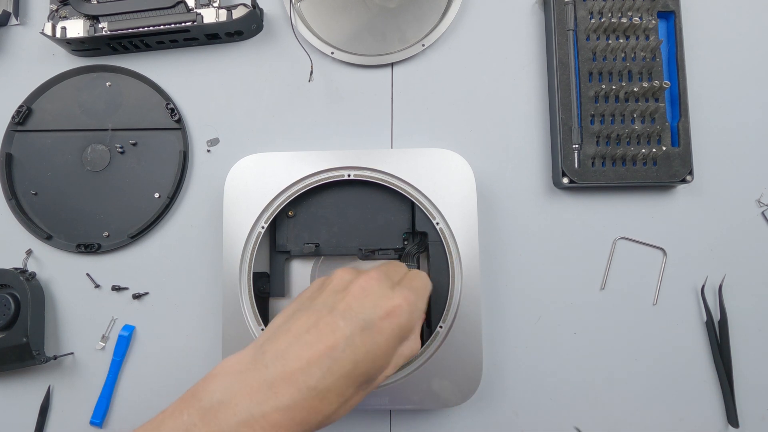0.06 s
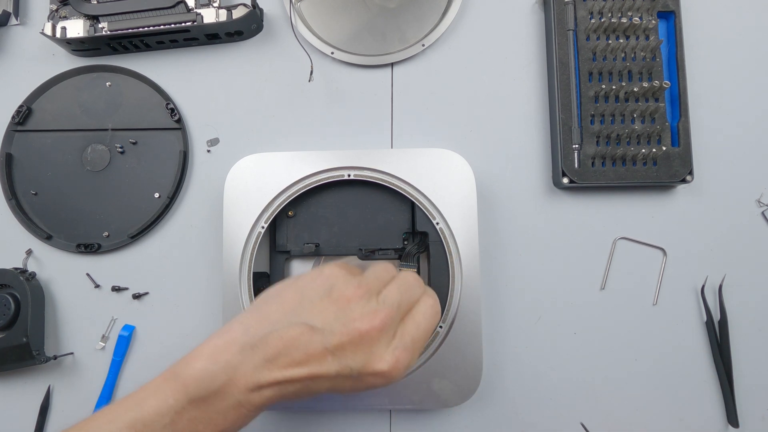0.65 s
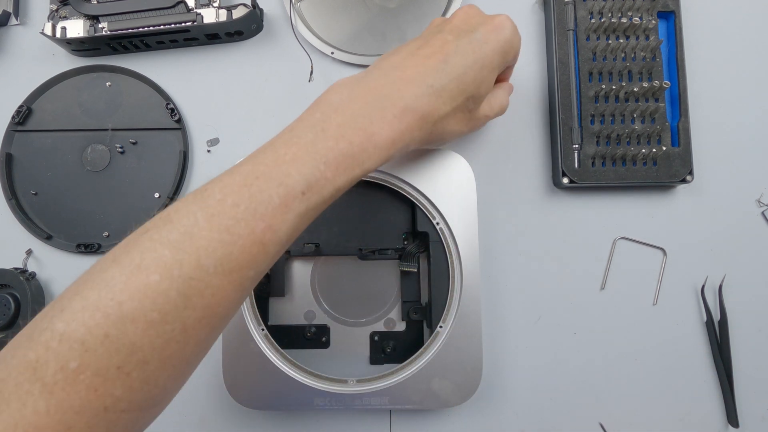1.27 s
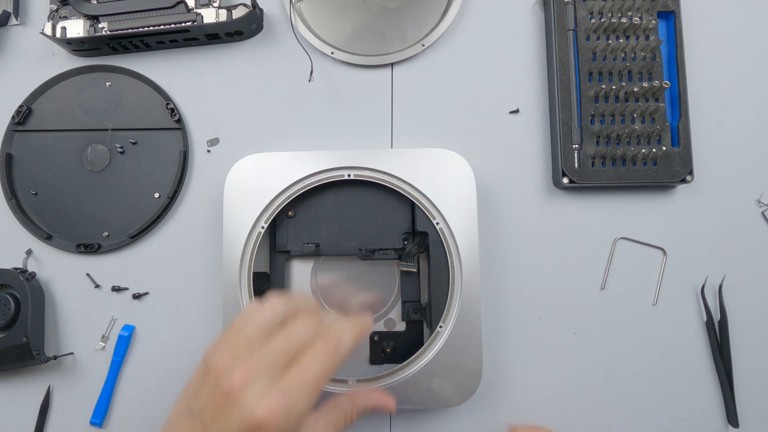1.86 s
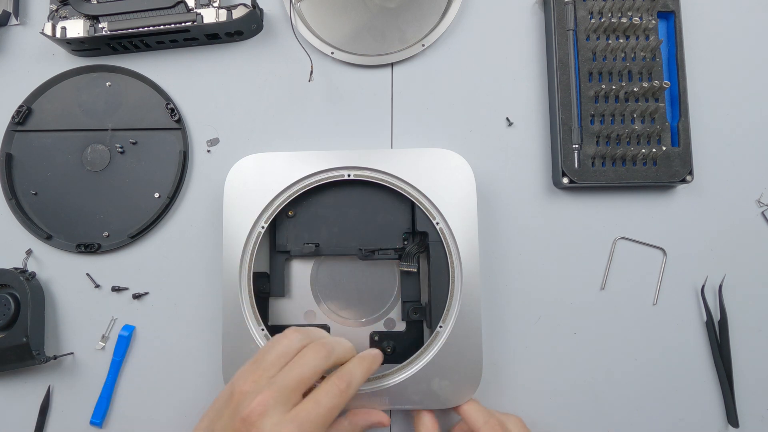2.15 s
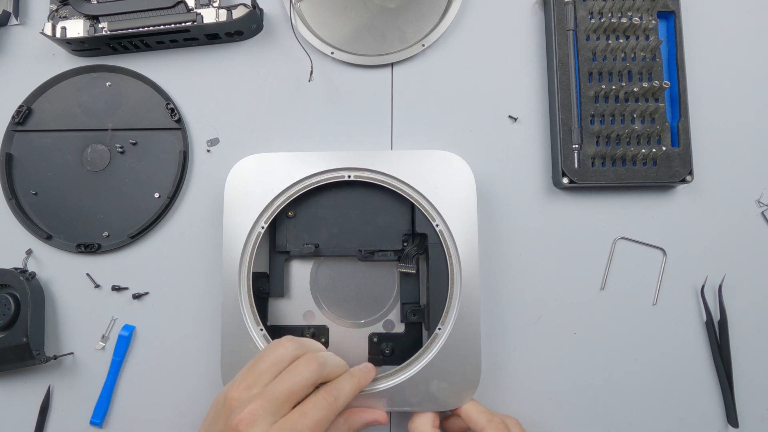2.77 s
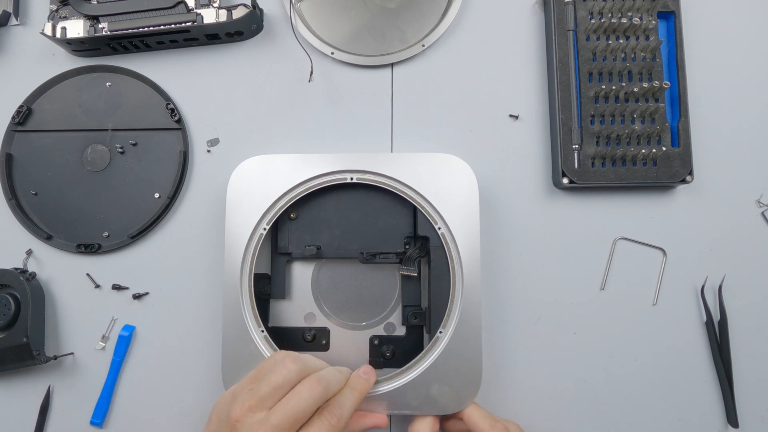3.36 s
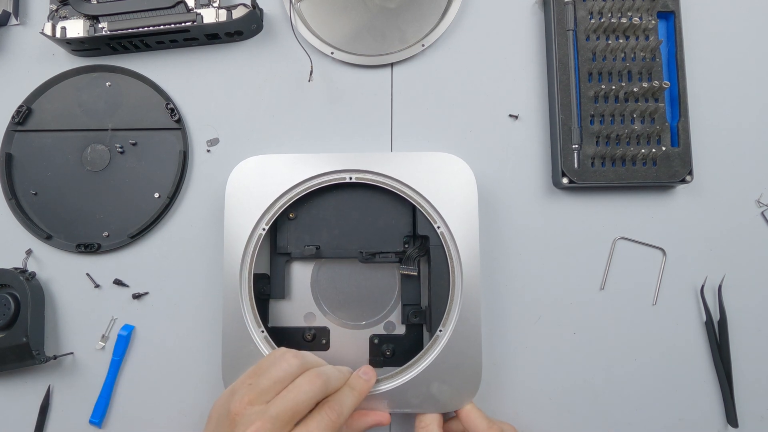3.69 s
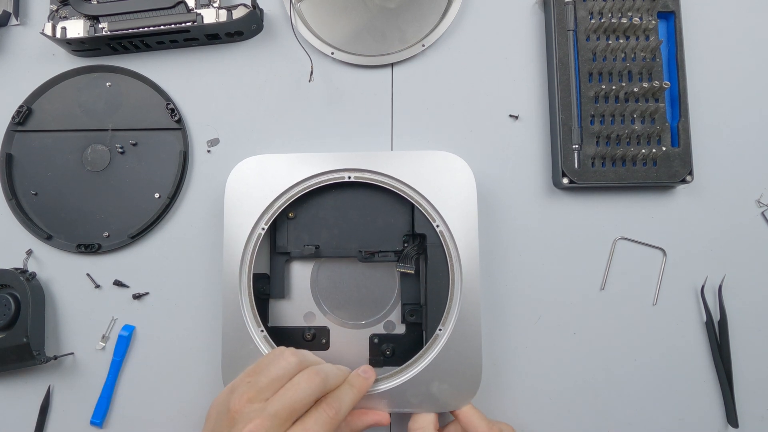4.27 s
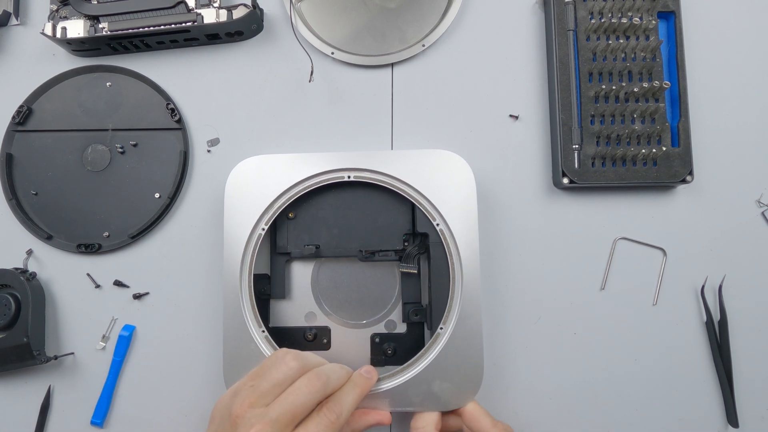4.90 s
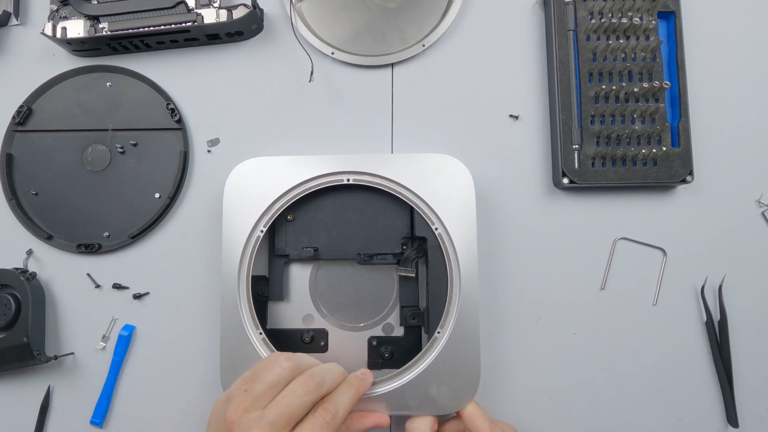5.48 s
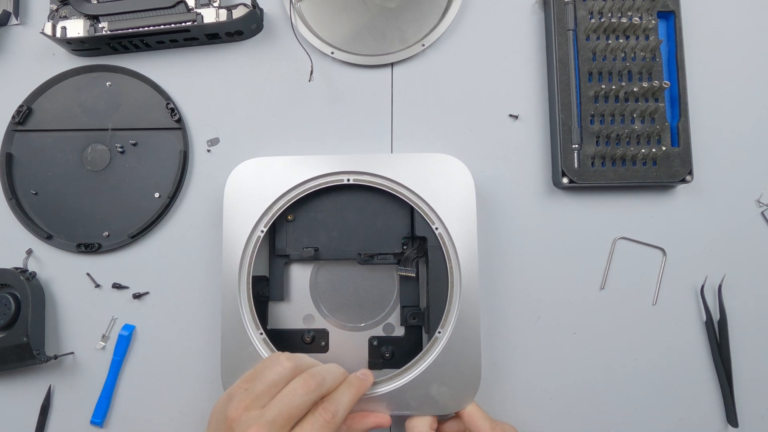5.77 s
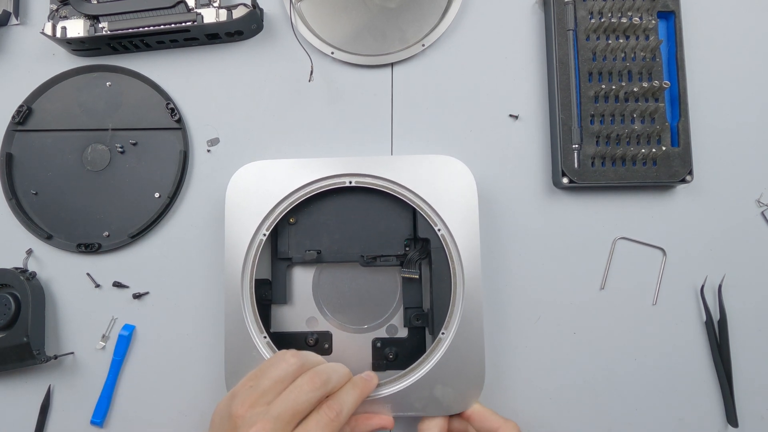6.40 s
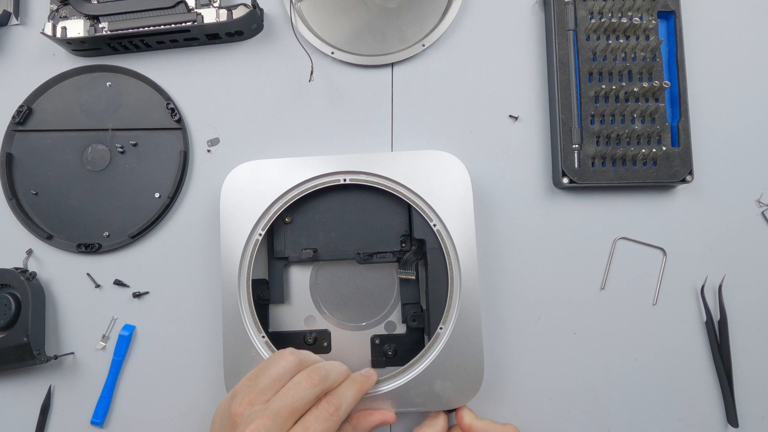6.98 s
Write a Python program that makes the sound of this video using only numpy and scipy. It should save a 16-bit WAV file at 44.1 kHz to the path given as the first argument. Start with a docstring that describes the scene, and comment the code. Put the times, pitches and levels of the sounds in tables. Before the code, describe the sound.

A small screw ticks against metal as it is picked out of an open aluminium computer case and put down. After some faint rubbing, fingers push at a part inside, and its edges catch and release in irregular hard clicks that ring the shell faintly. The case rocks on the desk with light knocks and thuds, busier and louder in the second half. The sound is close, in a small quiet room.

```python
"""A desk in a small quiet room, close up: hands work on an open aluminium computer case.
A screw is picked out and put down, then fingers push at a part inside. Edges catch and let go in hard
clicks that ring the shell, the case rocks on the desk with a tick and a thud, and skin scuffs the metal.
Each contact is a burst of micro-slips played through the resonances of the parts or the desk top.
Underneath, a forearm sweeps by, fingers creep and the desk rumbles under the arms, over low room tone."""
import sys
import numpy as np
from scipy import signal
from scipy.fft import rfft, irfft
from scipy.io import wavfile
from scipy.ndimage import uniform_filter1d, minimum_filter1d

SR = 44100
rng = np.random.default_rng(int(sys.argv[2]) if len(sys.argv) > 2 else 0)


def wrap_up_sound(samples):
    """Save the sound to the file named by the first command line argument, as 16-bit audio."""
    columns = np.atleast_2d(samples).T
    # keep every value between -1 and 1, then stretch to whole-number steps
    tamed = np.clip(columns, -1, 1)
    steps = np.round(tamed * 32767).astype(np.int16)
    wavfile.write(sys.argv[1], SR, steps)


N = 319725
FFT_SIZE = 16384
TIME = np.arange(N) / SR
AGE = np.arange(FFT_SIZE) / SR
BINS_HZ = np.arange(FFT_SIZE // 2 + 1) * SR / FFT_SIZE

# the case rocks on the desk: start_s, tick_db, tick_brightness_octaves, thud_db, thud_tilt_db_per_octave
CASE_KNOCKS = [(0.475, -60, 0, -41, .5), (.528, -58, 0, -42, -1), (1.204, -32.5, -0.54, -43, -2),
               (1.33, -28.5, -0.61, -50, 2), (2.412, -49.5, 0.37, -48.5, 5.5),
               (2.674, -34.5, 0.99, -38.5, -1), (2.914, -69, 0, -48, -3), (3.146, -58.5, 0, -51.5, -4),
               (3.279, -57, -0.091, -49, -3), (3.4872, -31, 0.28, -44.5, 4), (3.537, -24.5, 0.85, -37.5, 0),
               (3.6473, -23, 0.15, -29.5, -0.5), (3.661, -30, 0.3, -42.5, -7), (3.685, -46, 0, -38, -1),
               (3.921, -38, -0.073, -47.5, 3), (4.232, -44.5, -0.32, -41.5, -1.5),
               (4.348, -42.5, -0.45, -40, -3.5), (4.552, -32, 0.53, -39, 0),
               (4.829, -36.5, 0.098, -41, -1.5), (4.928, -27, -0.85, -34, 1), (4.972, -22, .1, -28.5, 2.5),
               (5.008, -24, -0.086, -36, 1), (5.161, -33.5, 0.45, -48, 0), (5.465, -35.5, -0.64, -40, 0),
               (5.632, -32.5, 0.27, -33.5, 0.5), (5.681, -28, -0.16, -33, -0.5),
               (5.749, -36, -0.2, -39, -2), (5.877, -56, 0.17, -45, 0), (5.9778, -27.5, 0.013, -52.5, 10),
               (6.256, -16, .25, -22.5, -1), (6.379, -35, -0.12, -38.5, -4.5),
               (6.4915, -35, 0.13, -40, -2.5), (6.541, -39.5, -0.38, -43, 2),
               (6.9001, -27, -0.034, -34, -1.5), (6.94, -34, 0.23, -42.5, -2.5),
               (7.227, -19, 0.62, -39, -1)]
# quickly damped resonances of the parts in contact: pitch_hz, width_hz, level_db
PART_MODES = [(575, 360, 1), (1260, 450, 0), (1773, 580, -11.5), (2633, 210, 2.5), (2987, 300, -2),
              (3630, 97, -16), (4950, 740, 1.5), (5670, 560, -1.5), (6330, 1700, -5), (7240, 840, -11.5)]
# band borders for clicks, scuffs and reverb: edge_hz
BAND_EDGES_HZ = (170, 400, 1100, 2300, 4300, 8200, 13000)


def clicks():
    """Screw, knocks and catching edges: the parts ring for milliseconds and the shell sings on faintly."""
    # an edge catches and lets go: start_s, contact_ms, level_db, brightness_octaves
    catches = [(2.7165, 2.9, -40.5, 0.13), (3.524, 2.6, -35, 1), (3.7495, 2.3, -40, 0.24),
               (3.785, 2.3, -47.5, 0), (3.862, 1.8, -49, 0), (3.97, 0.89, -28.5, 1.9),
               (3.9742, 0.92, -23.5, 0.84), (4.0243, 0.92, -19, 0.62), (4.5217, 1.58, -14.5, 0.81),
               (4.6142, 1.03, -16, 1.07), (4.9108, 1.82, -11.5, 0.86), (4.9195, 0.74, -31, 0.77),
               (5.02, 1.04, -29, 1.13), (5.057, 1.6, -34, 0.098), (5.142, .8, -33, 1.24),
               (5.531, 2.25, -43.5, 0.56), (5.696, 1.26, -32.5, 1.35), (6.8495, 2.2, -27.5, 0.99),
               (6.859, 2.9, -31.5, 0.61), (6.913, 2.2, -26, 0.85), (7.052, 3.5, -35, 0.66)]
    # the catching edge's own resonance: pitch_hz, width_hz, level_db
    edge_modes = [(1784, 420, 4.5)]
    catch_rows = voiced(catches, skirt_db=12.5, weight_db=-5.5, air_db=-17)
    snap = 0
    for rows, modes in [(screw_ticks() + knock_ticks(), PART_MODES), (catch_rows, PART_MODES + edge_modes)]:
        snap += contacts(rows, BAND_EDGES_HZ, modes, direct=0.38, soft_hz=10500, spot_db=1,
                         dispersion=0.072, side=0.2, grain_db=1.5, size=4096)
    return undb(-2.35) * snap + undb(-13) * shell_ring(snap)


def screw_ticks():
    """Contact rows for the screw: bright ticks, and five equal touches as it chatters free."""
    # picked out and put down: start_s, contact_ms, level_db, brightness_octaves
    ticks = [(.382, 1.6, -33.5, 1.4), (.468, 2.2, -28, 1.8), (.4942, 2.36, -18.5, 1.85),
             (.604, 1.9, -42.5, 2), (1.3795, 1.68, -25.5, 1.95), (1.404, 2.3, -36, -0.35)]
    chatter = [(.5158 + k * .0047, 0.55, -33.5, 3.1) for k in range(5)]  # same columns
    return voiced(ticks + chatter, skirt_db=7.5, weight_db=-7.5, air_db=-18)


def knock_ticks(contact_ms=1.61):
    """Contact rows for the hard attack of the case meeting the desk."""
    ticks = [(start, contact_ms, db, brightness) for start, db, brightness, _, _ in CASE_KNOCKS]
    return voiced(ticks, skirt_db=9, weight_db=-7, air_db=-15)


def shell_ring(snap):
    """Each click sets the narrow modes of the aluminium shell ringing."""
    # shell modes: pitch_hz, width_hz, level_db
    shell_modes = [(513, 17, 10), (660, 57, 3), (816, 10, 15), (918, 9.9, 2), (1340, 48, -1),
                   (1443, 78, -0.5), (1840, 13, -0.5), (1900, 33, -3.5), (2500, 12, -11), (2560, 12, -4),
                   (3540, 16, -1), (4140, 26, -6.5), (4670, 12, -0.5), (5600, 33, 1)]
    impulse = irfft(resonances(shell_modes).sum(axis=0))
    return signal.fftconvolve(snap, impulse[None], axes=1)[:, :N]


def thuds(boom_db, contact_ms=3.73):
    """The rocking case drops its weight on the desk top's low modes; the middle band booms most."""
    # modes of the loaded desk top: pitch_hz, width_hz, level_db
    desk_modes = [(26.1, 14, 3), (45, 9.7, -2.5), (73.6, 6.5, -0.5), (105.6, 7.4, -1.5), (137.9, 12, -1.5),
                  (164.8, 5, 3.5), (199, 6.6, -10.5), (233, 42, -4), (285, 21, -2), (317.5, 4.7, -8.5),
                  (396, 39, -15), (450, 80, -10)]
    # borders of the three bass bands: edge_hz
    edges_hz = (22, 70, 200, 420)
    edges = np.log2(edges_hz)
    octaves_down, octaves_up = np.diff((edges[1:] + edges[:-1]) / 2)
    rows = [(start, contact_ms, db - tilt * octaves_down, db + boom_db, db + tilt * octaves_up)
            for start, _, _, db, tilt in CASE_KNOCKS]
    return undb(4) * contacts(rows, edges_hz, desk_modes, direct=0.046, soft_hz=3000, spot_db=2,
                              dispersion=0.033, side=.04, grain_db=4)


def scuffs():
    """Skin and plastic rub the metal parts in longer, grainier contacts."""
    # short rubs: start_s, contact_ms, level_db, brightness_octaves
    rubs = [(.25, 25.5, -60, 1.17), (.46, 4.7, -45, 1.3), (2.235, 11.3, -46, 1.67),
            (2.408, 16, -43.5, 0.32), (2.502, 10.2, -49.5, 0.12), (3.357, 6.6, -51.5, -0.49),
            (3.955, 7.6, -48, 0.66), (4.498, 14, -52, -0.15), (4.877, 10, -42.5, 0.16),
            (4.935, 36, -49, .1), (5.012, 5.4, -34.5, 0.58), (5.234, 5.1, -43, 0.018),
            (5.25, 25, -54, 0.26), (5.574, 15, -57.5, 1.6), (5.688, 3.4, -36.5, 0.69),
            (5.803, 10.8, -46.5, 0.11), (5.945, 14, -55.5, -0.025), (6.06, 17, -52.5, -0.08),
            (6.22, 12, -50, 0.21), (6.262, 5.2, -21, 0.23), (6.273, 5.6, -30.5, 1.5),
            (6.712, 10.3, -49.5, -0.24), (6.868, 7.1, -37.5, 0.48), (7.017, 12.3, -43, 0.61),
            (7.195, 15, -41, 0.63)]
    rows = voiced(rubs, skirt_db=5.5, weight_db=-4.5, air_db=-12.5)
    return undb(-1.86) * contacts(rows, BAND_EDGES_HZ, PART_MODES, direct=0.51, soft_hz=12000,
                                  spot_db=0.5, dispersion=0, side=0.28, grain_db=4.5)


def bearing_down():
    """Pressing arms shake the desk; gripping fingers creep in small jerks."""
    # each push on the case: start_s, end_s, rumble_db, creep_db
    grips = [(0, .5, -57, -73.5), (2.143, 2.45, -50, -59.5), (2.73, 3.9, -45.5, -55), (4.2, 4.5, -48, -59),
             (4.87, 5.6, -51, -55), (5.9, 6.05, -53, -60.5), (6.312, 6.5, -47.5, -55),
             (6.818, 7.25, -50, -56)]
    # spectrum of creeping fingers: frequency_hz, level_db
    creep_colour = [(20, -33.5), (75, -16), (105, 0.5), (290, -5.5), (380, -12.5), (520, -14), (750, -30.5),
                    (1300, -18), (2100, -28), (3000, -36), (7500, -41), (13000, -67.5)]
    rumble_colour = [(10, -28), (20, 1.5), (27, 3.5), (48, -4), (70, -18.5), (130, -48.5), (400, -100)]
    attack_s, release_s = 0.22, 0.21
    press = envelope([(start, end, db) for start, end, db, _ in grips], attack_s, release_s)
    grip = envelope([(start, end, db) for start, end, _, db in grips], attack_s, release_s)
    rumble = noise(rumble_colour, side=.25) * press
    creep = noise(creep_colour, side=0.39) * grip
    return rumble * undb(3.3 * wander(11)) + creep * undb(4.8 * wander(25))


def hand_slide():
    """The hands slide onto the case with a brief hiss."""
    # the move: start_s, end_s, level_db
    slides = [(2.02, 2.3, -60)]
    # spectrum of skin on metal: frequency_hz, level_db
    colour = [(410, -22), (700, -5), (1330, -1.5), (1850, 0), (2490, -0.5), (6860, -5), (13000, -23),
              (15000, -43)]
    return rub(envelope(slides, attack_s=0.02, release_s=0.12), colour, flutter_db=1)


def forearm_sweep():
    """A forearm brushes softly out and back over the desk."""
    # the two strokes: start_s, end_s, level_db
    sweeps = [(.82, 1.15, -78.5), (1.78, 2.0, -63.5)]
    # spectrum of the arm on the desk: frequency_hz, level_db
    colour = [(290, -49), (500, -12), (739, -4), (2350, -10.5), (2860, -17), (3990, -10), (6690, -14.5),
              (14000, -41)]
    return rub(envelope(sweeps, attack_s=0.22, release_s=.1), colour, flutter_db=2)


def reverb(dry, wet_db, t60_low_s, t60_high_s, predelay_s, mono_below_hz):
    """Nearby walls return a short diffuse tail, duller as it fades and narrow in the bass."""
    tail = 0
    for lo, hi in zip(BAND_EDGES_HZ, BAND_EDGES_HZ[1:]):
        t60 = np.interp(np.log(hi), np.log([400, 13000]), [t60_low_s, t60_high_s])
        fade = np.exp(-np.log(1000) * AGE / t60) * np.clip(AGE / predelay_s - 1, 0, 1)
        mid, wide = irfft(rfft(rng.standard_normal((2, FFT_SIZE))) * band(lo, hi)) * fade
        wide = wide * lo / (lo + mono_below_hz)
        tail = tail + np.array([mid + wide, mid - wide])
    tail = tail / np.linalg.norm(tail, axis=1, keepdims=True)
    return dry + undb(wet_db) * signal.fftconvolve(dry, tail, axes=1)[:, :N]


def room_tone(level_db):
    """A low, gently wavering bed of noise."""
    # spectrum of the still room: frequency_hz, level_db
    colour = [(12, -40), (20, 0), (92, -7), (211, -0.5), (270, -11), (328, -6), (387, -31.5), (445, -15),
              (733, -33.5), (1390, -32), (2930, -43.5), (7510, -43.5), (12700, -57), (15000, -55)]
    return noise(colour, side=1) * undb(level_db + 2.4 * wander(6.3))


def microphone_pair(sound, left_lead_ms):
    """The case sits almost midway between two microphones, each hearing its own colour."""
    # stereo balance: frequency_hz, left_minus_right_db
    balance = [(60, 1), (300, -1.3), (1400, -1), (3000, -0.3), (6000, -0.2), (10000, 4.5)]
    hz = np.arange(N // 2 + 1) * SR / N + 1
    left = undb(curve_db(balance, hz) / 2) * np.exp(1j * np.pi * hz * left_lead_ms / 1000)
    return irfft(rfft(sound) * np.array([left, 1 / left]), N)


def voiced(rows, skirt_db, weight_db, air_db):
    """Band levels per contact: a hump at its brightness (octaves above 1 kHz), skirt_db per octave."""
    edges = np.log2(np.array(BAND_EDGES_HZ[1:-1]) / 1000)
    octaves = (edges[1:] + edges[:-1]) / 2
    out = []
    for start, ms, db, brightness in rows:
        hump = -skirt_db * np.hypot(octaves - brightness, .5)
        levels = db + hump - 20 * np.log10(np.linalg.norm(undb(hump)))
        out.append((start, ms, levels[0] + weight_db, *levels, levels[-1] + air_db))
    return out


def contacts(rows, edges_hz, modes, direct, soft_hz, spot_db, dispersion, side, grain_db, size=FFT_SIZE):
    """Play rows of start_s, contact_ms and band levels through a body; each spot favours other modes."""
    softening = (1 + 1j * BINS_HZ / soft_hz) ** 4
    bands = [band(lo, hi, order=5) / softening for lo, hi in zip(edges_hz, edges_hz[1:])]
    lags = (np.array(edges_hz[1:]) / np.median(edges_hz)) ** -dispersion  # low bending waves are slower
    body = resonances(modes)
    out = np.zeros((2, N))
    for start, ms, *levels_db in rows:
        mode_gains = undb(spot_db * rng.standard_normal((len(body), 1)))
        spot = direct + (mode_gains * body).sum(axis=0)
        add(out, start, micro_slips(ms, levels_db, [spot * b for b in bands], lags, side, grain_db, size))
    return out


def micro_slips(contact_ms, levels_db, bands, lags, side, grain_db, size):
    """One contact: a cluster of tiny slips swells and dies, with its own strength in each band."""
    span_s = max(contact_ms, .3) / 1000
    slips = rng.standard_normal((2, size // 2)) * undb(grain_db * rng.standard_normal(size // 2))
    out = 0
    for k, (db, response, lag) in enumerate(zip(levels_db, bands, lags)):
        progress = AGE[:size // 2] / (span_s * lag)
        burst = slips * progress * np.exp(-progress)
        mid, wide = irfft(rfft(burst, size) * response[::FFT_SIZE // size])
        mid = mid / np.linalg.norm(mid)
        wide = side * wide / np.linalg.norm(wide)
        out = out + (-1) ** k * undb(db) * np.array([mid + wide, mid - wide])
    return out * np.sqrt(2 * span_s * SR)


def rub(gain, colour, flutter_db):
    """Skin or cloth sliding along: a hiss that flutters as it grips and slips."""
    return noise(colour, side=0.27) * gain * undb(flutter_db * wander(130))


def envelope(rows, attack_s, release_s):
    """Each movement swells, holds its level from start to end, and dies away."""
    out = 0
    for start, end, db in rows:
        rise = 1 + (TIME - start) / attack_s
        fall = 1 - (TIME - end) / release_s
        out += undb(db) * np.clip(np.minimum(rise, fall), 0, 1)
    return out


def resonances(modes):
    """Frequency responses of damped modes, one row each."""
    return np.array([undb(db) * 1j * BINS_HZ * width / (hz ** 2 - BINS_HZ ** 2 + 1j * BINS_HZ * width)
                     for hz, width, db in modes])


def band(lo, hi, order=3):
    """Frequency response of a causal band-pass."""
    sections = signal.butter(order, [lo, hi], "band", fs=SR, output="sos")
    return signal.sosfreqz(sections, BINS_HZ, fs=SR)[1]


def noise(colour, side):
    """Coloured stereo noise of rms 1, centred in the bass; side sets its width."""
    hz = np.arange(N // 2 + 1) * SR / N + 1
    mid, wide = rfft(rng.standard_normal((2, N))) * undb(curve_db(colour, hz))
    wide = wide * side * hz / (hz + 1000)
    out = irfft(np.array([mid + wide, mid - wide]), N)
    return out / out.std()


def curve_db(points, hz):
    """An EQ curve joining its points over log frequency."""
    points_hz, db = np.transpose(points)
    return np.interp(np.log(hz), np.log(points_hz), db)


def wander(rate_hz):
    """Smooth random drift with a spread near 1."""
    hold = max(int(SR / rate_hz), 1)
    steps = np.repeat(rng.standard_normal(N // hold + 1), hold)
    return 1.07 * uniform_filter1d(uniform_filter1d(steps, hold), hold)[:N]


def undb(db):
    """Decibels to gain."""
    return 10 ** (np.asarray(db) / 20)


def add(track, start_s, sound):
    """Mix a sound into a track."""
    start = max(int(start_s * SR), 0)
    part = sound[..., :max(N - start, 0)]
    track[..., start:start + part.shape[-1]] += part


def scene():
    """All the handling over the still room."""
    foley = forearm_sweep() + hand_slide() + clicks() + scuffs() + thuds(boom_db=2)
    near = reverb(foley, wet_db=-8, t60_low_s=0.25, t60_high_s=0.19, predelay_s=0.00095, mono_below_hz=1790)
    bed = room_tone(level_db=-55.5)
    return microphone_pair(near + bearing_down(), left_lead_ms=0.0016) + bed


def record(dry):
    """A fast limiter holds down the hardest clicks, then a steep low-pass cuts the top."""
    ceiling, top_hz = .41, 14500
    gain = ceiling / np.maximum(np.abs(dry).max(axis=0), ceiling)
    gain = uniform_filter1d(minimum_filter1d(gain, size=65), size=65)
    return signal.sosfilt(signal.ellip(8, .2, 70, top_hz, fs=SR, output="sos"), dry * gain)


dry = scene()
out = record(dry)
wrap_up_sound(out)
```